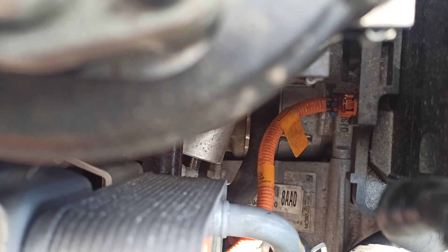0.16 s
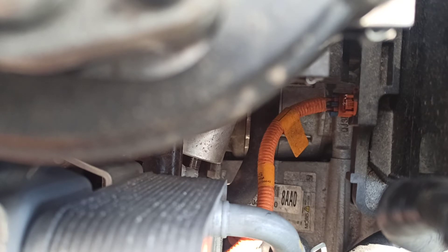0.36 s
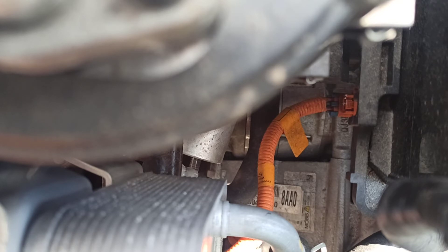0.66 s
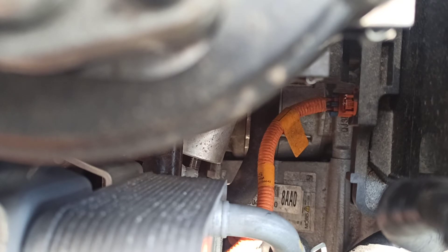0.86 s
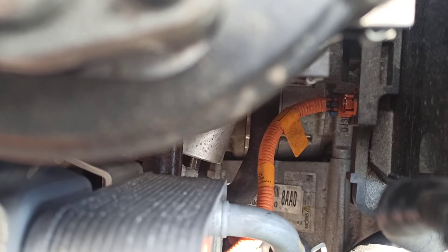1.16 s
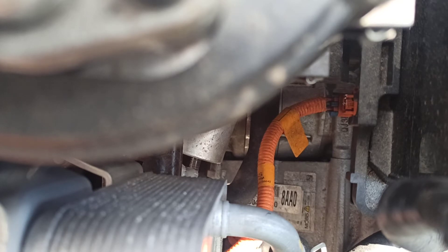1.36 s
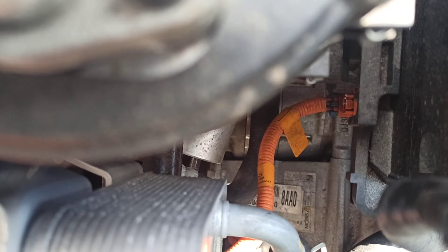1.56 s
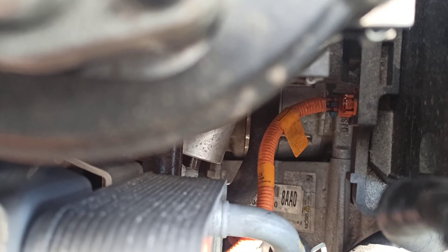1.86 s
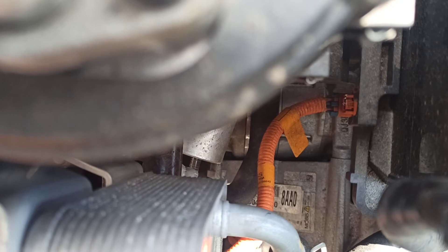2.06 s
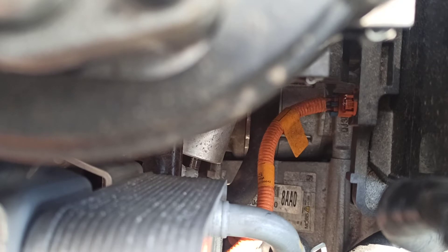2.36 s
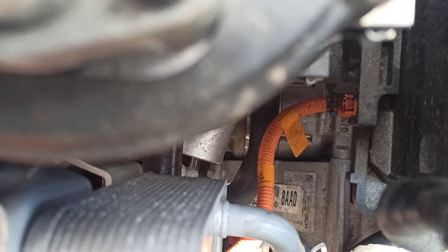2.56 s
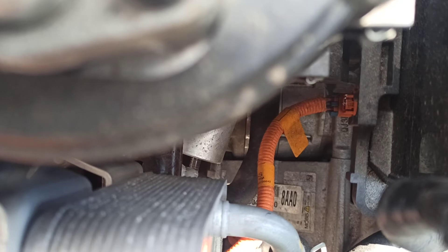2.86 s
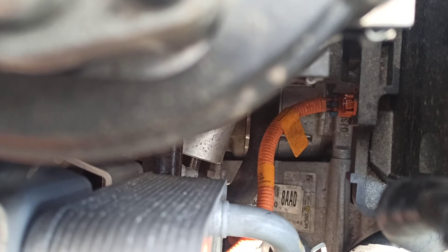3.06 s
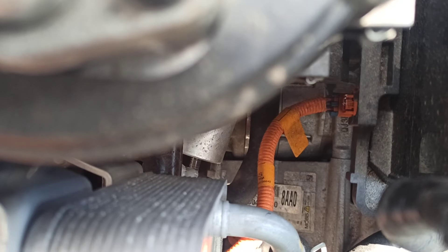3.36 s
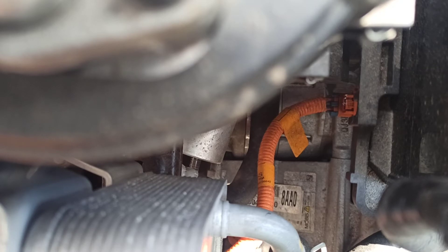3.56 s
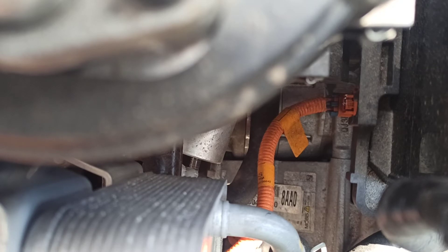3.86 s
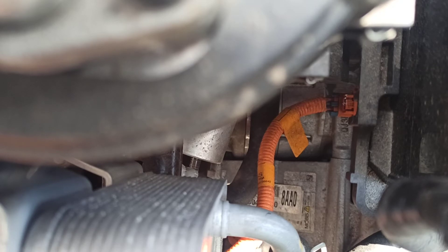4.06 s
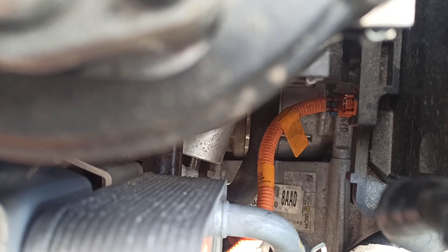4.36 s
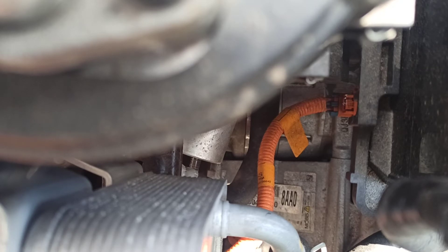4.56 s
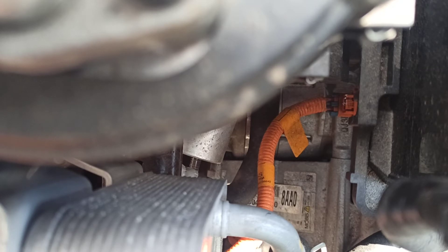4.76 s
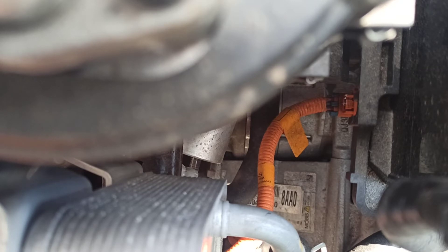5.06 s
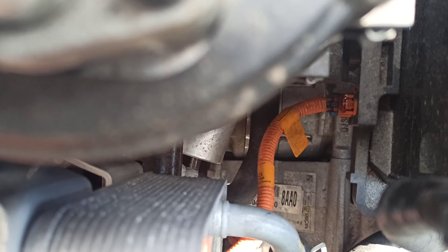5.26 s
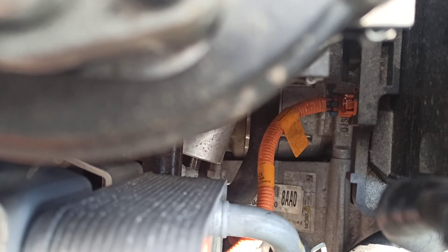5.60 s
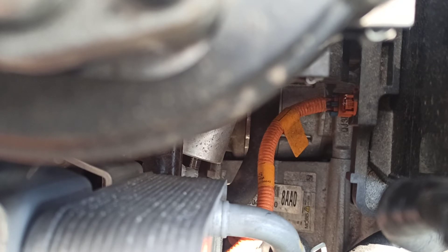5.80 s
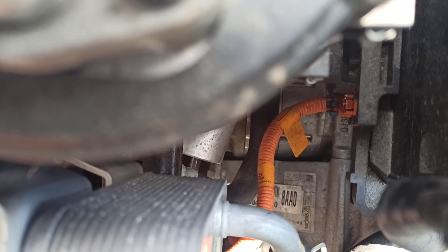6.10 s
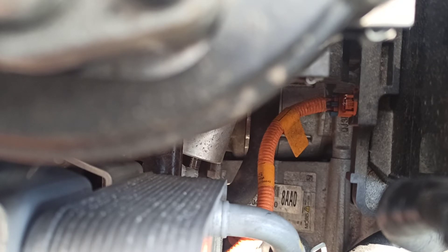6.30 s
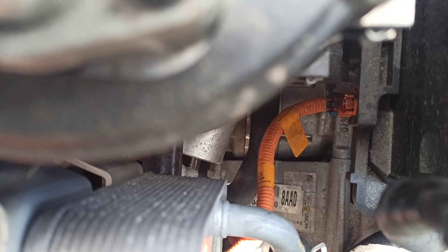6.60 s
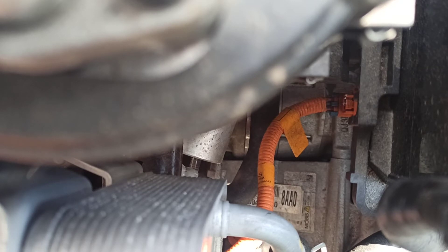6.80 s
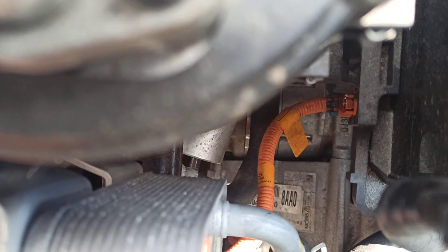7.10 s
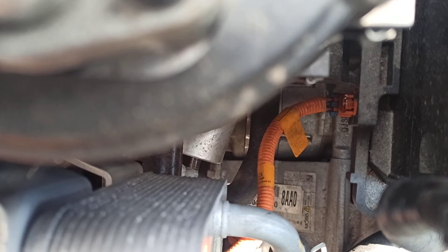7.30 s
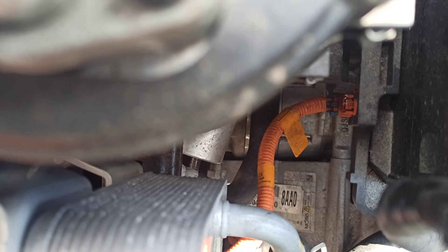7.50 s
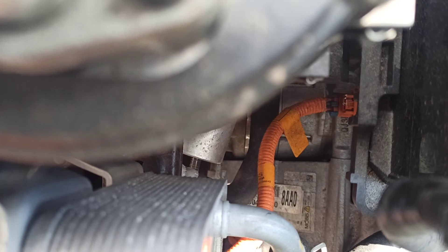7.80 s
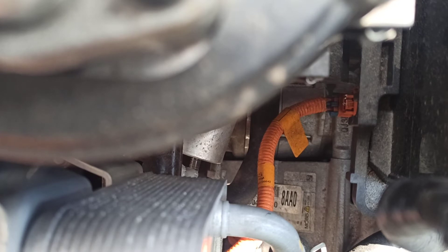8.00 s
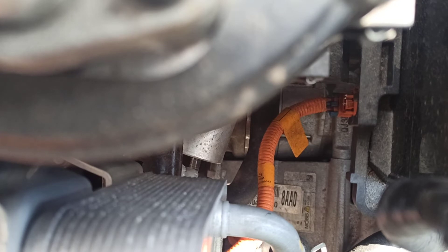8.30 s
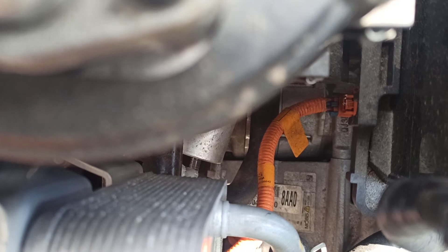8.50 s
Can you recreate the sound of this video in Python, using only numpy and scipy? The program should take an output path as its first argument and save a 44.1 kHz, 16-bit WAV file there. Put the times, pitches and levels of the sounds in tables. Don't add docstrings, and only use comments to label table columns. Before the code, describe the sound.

Under a parked car, an electric compressor's switch clatters, its motor whines upward, hums and clunks to a stop, twice, over faint town rumble.

```python
import sys
import numpy as np
from scipy import signal
from scipy.fft import rfft, irfft
from scipy.io import wavfile
from scipy.ndimage import uniform_filter1d

SR = 44100
rng = np.random.default_rng(int(sys.argv[2]) if len(sys.argv) > 2 else 0)


def dump(signal):
    limited = np.clip(np.atleast_2d(signal).T, -1, 1)
    pcm = np.round(limited * 32767).astype(np.int16)
    wavfile.write(sys.argv[1], SR, pcm)


def natural_amplitude(level_db):
    exponent = np.asarray(level_db, float) / 20
    return 10 ** exponent


N = 381465
T = np.arange(N) / SR

# (start [s], end of the speeding up [s], current cut [s], rotor locked [s], overshoot pitch [Hz])
RUNS = [
    (1.55, 2.11, 3.095, 3.14, 2093),
    (7.162, 7.729, 7.91, 7.945, 2265),
]
# (time [s], knock [dB], thud [dB], crack [dB])
LATCHES = [
    [(0.9334, -10.5, -30, -27), (0.9398, -13.5, -19, -20.5), (0.9464, -8, -27, -33.5),
     (0.9504, -9.5, -34, -37.5), (0.9624, -11.5, -18.5, -23.5), (0.9784, -14, -20, -26),
     (1.0011, -14, -30, -31), (1.0114, -14.5, -25, -32), (1.0405, -16, -33, -28.5),
     (1.0535, -16, -26.5, -36.5)],
    [(6.3674, -20, -40.5, -46), (6.3724, -30, -40.5, -57), (6.3849, -8, -21, -24.5),
     (6.4058, -8.5, -23.5, -26.5), (6.4314, -21.5, -37, -32), (6.4444, -22, -27, -34)],
]
# (time [s], knock [dB], thud [dB], crack [dB])
STOPS = [
    (3.1465, -13.5, -24.5, -32),
    (7.9503, -14, -23.5, -31),
]
# (time [s], knock [dB], thud [dB], crack [dB])
TAPS = [(1.48, -37, -52.5, -58.5), (1.5284, -44, -43, -45.5), (2.1031, -38, -38.5, -60),
        (3.0884, -36.5, -60.5, -47.5), (4.2444, -59, -57, -68.5), (4.6174, -51.5, -59.5, -64),
        (4.6329, -47.5, -58, -58), (7.0259, -43.5, -74, -55.5), (7.0858, -44, -56, -59),
        (7.1487, -40.5, -45.5, -50), (8.0366, -50, -52, -60)]
# (time [s], level [dB])
TICKS = [
    (1.529, -42.5),
    (2.0991, -40.5),
    (7.151, -43.5),
]

# (pitch [Hz], width [Hz], level [dB])
PAN_MODES = [(476, 24, 0), (545, 28, -10), (590, 28, -9), (690, 50, -12), (787, 38, -8), (920, 40, -6),
             (1112, 26, -13)]
# (pitch [Hz], width [Hz], level [dB])
CAST_MODES = [(1372, 34, -8), (1537, 28, 3), (1666, 24, -12), (1794, 40, -3), (1890, 28, -5),
              (1990, 40, -10), (2102, 32, -3), (2155, 28, 4), (2387, 32, -4), (2544, 34, -10),
              (2927, 44, -14)]
# (pitch [Hz], width [Hz], level [dB])
SHELL_MODES = [(3275, 92, -0.5), (3620, 130, -3), (4044, 160, -3.5), (5190, 38, -12.5), (5386, 76, -16),
               (6590, 45, -3), (7170, 180, -3), (7340, 150, -3.5), (8000, 43, -8)]
# (pitch [Hz], width [Hz], level [dB])
PIPE_MODES = [(818, 6.5, 0), (533, 10, -9), (587, 9, -13), (2353, 11, -12)]
# (pitch [Hz], width [Hz], level [dB])
BRACKET_MODES = [(1480, 4.6, 0), (2380, 14, -2), (903, 10, 4), (640, 11.06, -4), (3520, 7, -9),
                 (7300, 11.05, -10.5), (7310, 6, -12.5)]
# list of (frequency [Hz], level per Hz [dB]), then its share [dB]
PAN_REST = ([(100, -37.5), (170, -16), (300, -28), (450, -9.5), (650, -7), (950, -1.5), (1250, -12),
             (1700, -50)], -3)
CAST_REST = ([(800, -41.5), (1150, -9.5), (1450, -0.5), (2100, 0.5), (2450, -9), (3000, -7.5), (4200, -35)],
              1.2)
SHELL_REST = ([(1590, -28.5), (2700, -3.5), (3520, -7), (4320, 1), (5020, -10.5), (6020, -11), (7450, -7.5),
               (8470, -16), (8860, -28.5), (10200, -34.5), (11100, -39.5), (12300, -24.5), (14900, -25),
               (16000, -28), (16500, -81.5)], 1)
TICK_REST = ([(2000, -40), (4300, -4.5), (5500, -4.5), (7500, 7), (8700, -3.5), (10000, -11), (12000, -1),
              (14500, 0.5), (16500, -3)], 0)
VALVE_REST = ([(500, -30), (800, -4.5), (950, 6), (1080, -8), (1250, -2.5), (1400, -13), (2000, -41)], 0)
# (frequency [Hz], left minus right [dB])
BODY_PAN = [(60, -2.5), (110, -3), (200, 3.5), (380, 5), (700, -0.5), (1290, 4), (2380, -1.5), (4400, -1.5),
            (8120, 10.5), (15000, -4.5)]
# (frequency [Hz], lead of the left port [radians])
BODY_TURN = [(0, 1.5), (1210, -2.5), (2150, -14), (3450, 0), (4130, -11), (4820, 6), (5860, 7.5),
             (6630, 7.5), (8790, -1), (10500, 5.5), (12600, 4.5), (13100, 13), (14000, 11.5), (16200, 11.5)]

# (frequency [Hz], level per Hz [dB])
TOWN_COLOUR = [(25, -48), (40, -19), (55, -16), (70, -5), (87, 0), (125, 0), (180, -9), (220, -5.5),
               (270, -13.5), (500, -15.5), (1000, -20.5), (2000, -28.5), (3500, -34.5), (5000, -60.5)]
# (frequency [Hz], level per Hz [dB])
HISS_COLOUR = [(1880, -32), (3200, -5), (3450, -2), (4570, 0.5), (5000, -9.5), (5460, -11.5), (6140, -1.5),
               (6850, 0), (8530, -6.5), (8890, -16.5), (11200, -15.5), (12100, -11), (15000, -7.5),
               (16200, -10), (16500, -33)]
# (frequency [Hz], likeness [0-1])
TOWN_ALIKE = [(60, 1), (130, 0.89), (290, .7), (640, 0.5), (1500, 0), (6000, 0.3), (15000, .05)]
# (frequency [Hz], lead of the left port [radians])
TOWN_TURN = [(0, 0), (520, 0.1), (2580, -7.3), (3880, -27.5), (4570, -20), (5170, -19), (7410, -30),
             (8530, -41.5), (8790, -41), (9130, -38.5), (9910, -28.5), (11300, -30), (14400, -38.5),
             (16200, -55)]
# (start [s], length [s], pitch [Hz])
SQUEALS = [
    (-.05, .22, 590),
    (4.43, .09, 585),
    (3.25, .35, 1770),
    (3.78, .3, 1800),
    (3.3, .8, 2030),
    (8.1, .5, 1775),
]
SQUEAL_DB = [-61, -56.5, -74, -73, -78, -74]

TEETH, POLES = 60, 5


def hits():
    rows = []
    for latch in LATCHES:
        for row in latch:
            ring_db = (-36.5, -34) if row is latch[-1] else (-47.5, -52.5)
            rows.append((*row, *ring_db))
    for row in TAPS:
        knock_db = row[1]
        rows.append((*row, knock_db - 16, knock_db - 24))
    return sorted(rows) + [(*row, -29.5, -50) for row in STOPS]


def blows():
    size = 4096
    force, t = np.zeros((6, 2, N + size)), np.arange(size) / SR
    rows = hits()
    contact = np.sqrt(size) * (t == 0)
    rise_s, decay_s = .0006, np.array([.006, .006, .009])[:, None, None]
    tails = np.exp(-t / decay_s) * (1 - np.exp(-t / rise_s))
    for (s, knock_db, thud_db, crack_db, pipe_db, bracket_db), chatter in zip(rows, grit((len(rows), 3, size))):
        i = int(s * SR)
        # (level [dB], share of first contact)
        kinds = (thud_db + 0.5, 1.2), (knock_db - 6.5, .15), (crack_db + 2.5, .08)
        for k, (db, share) in enumerate(kinds):
            force[k, :, i:i + size] += natural_amplitude(db) * (share * contact + unit(chatter[k] * tails[k])) / 3.68
        force[3:5, :, i:i + size] += natural_amplitude([[[pipe_db]], [[bracket_db]]]) * contact / 5.7
    for (s, db), chatter in zip(TICKS, grit((len(TICKS), size))):
        i = int(s * SR)
        force[5, :, i:i + size] += natural_amplitude(db - 13.5) * unit(chatter * np.exp(-t / .004))
    return force[..., :N]


def drive():
    start_hz, climb_hz_per_s, cruise_hz = 214.1, 1590, 1118
    surge_s, settle_s, ease_s = .05, .145, .32
    hz, effort_db = np.full(N, start_hz), np.zeros(N)
    coast, on = np.zeros(N), np.zeros(N)
    for start, top, cut, lock, overshoot_hz in RUNS:
        now = (T > start) & (T < lock)
        ramp = start_hz + climb_hz_per_s * (np.clip(T, start, top) - start)
        surge = np.clip((T - top) / surge_s, 0, 1)
        late = np.clip(T - top - surge_s, 0, None)
        goal = cruise_hz + (overshoot_hz - cruise_hz) * np.exp(-late / settle_s)
        hz = np.where(now, ramp + surge * (goal - ramp), hz)
        ease = np.exp(-late / ease_s)
        effort_db += now * surge * (5.5 * ease - 18 * (1 - ease))
        coast += now * np.clip((T - cut) / 0.004, 0, 1)
        on += now
    return hz, effort_db, coast, uniform_filter1d(on, size=400)


def scroll(turn):
    hz, _, coast, on = drive()
    octaves = np.log2(hz / 1000)
    thud_db = -52 + 4 * octaves + 7 * coast
    knock_db = -54 + 6.9 * octaves - 7 * coast
    hiss_db = -56.5 + 7.1 * octaves - 4.5 * coast
    beat_db = 2 * np.cos(turn) + 1.6 * walk(60)
    thud_db = thud_db + sum(19.5 * np.exp(-np.abs(T - run[0]) / 0.018) for run in RUNS)
    levels_db = np.array([thud_db, knock_db, hiss_db, thud_db - 9.0, knock_db - 37, hiss_db - 4.5])
    beat_share = np.array([[1], [1], [.5], [1], [1], [.5]])
    return on * grit((6, N)) * natural_amplitude(beat_share * beat_db + levels_db)[:, None]


def motor():
    hz, load_db, _, on = drive()
    load_db = load_db + 4 * np.log2(hz / 1000)
    slack_s, slack_db = .14, -9
    slack = sum(np.clip(2 * (T - run[1] + slack_s) / slack_s, 0, 1) * (T < run[1]) for run in RUNS)
    whine_db = -56 + load_db + slack_db * slack
    undertone_db = -61 + load_db - slack_db * slack / 2

    phase = 2 * np.pi * np.cumsum(hz * (1 + .02 * walk(70))) / SR
    phase += 1.3 * np.sin(phase / TEETH)
    turn = phase / TEETH
    tones = 0
    for k, level_db in ((1, whine_db), (.43, undertone_db)):
        lead = read(BODY_TURN, k * hz, False) / 2
        pan = read(BODY_PAN, k * hz) / 2
        beat_db = 1.9 * walk(40) + 4.5 * np.cos(turn)
        size = np.sqrt(2) * natural_amplitude(level_db + beat_db + np.array([pan, -pan]))
        tones = tones + size * np.sin(k * phase + np.array([lead, -lead]))

    field = phase * POLES / TEETH
    carrier_hz, carrier_db = 9900, -84
    sway = .3 + .7 * np.cos(field) + 1.23 * np.cos(2 * field)
    switching = sway * np.sin(2 * np.pi * carrier_hz * T)
    speeding_up = uniform_filter1d(1. * (np.gradient(hz) > 0), size=4000)
    switching_db = 7.8 * speeding_up + carrier_db + 1.9 * walk(17)
    return on * tones, on * natural_amplitude(switching_db) * switching, turn


def valve(turn):
    on = drive()[-1]
    build_s, angle, sharpness = .2, 2.1, 2.2
    pressure = sum(np.clip((T - run[1]) / build_s, 0, 1) * (T < run[2]) for run in RUNS)
    puffs = unit(np.exp(sharpness * np.cos(turn - angle)))
    gas = natural_amplitude(-52.5) * on * pressure * puffs * grit((N,))
    return signal.fftconvolve(gas, body([], VALVE_REST), axes=1)[:, :N]


def body(modes, rest=None, size=16384):
    t, hz = np.arange(size) / SR, np.fft.rfftfreq(size, 1 / SR)
    lag_s = 0.000504
    out = np.zeros((2, size))
    for k, (f, width, db) in enumerate(modes):
        lead, pan = read(BODY_TURN, f, False) / 2, read(BODY_PAN, f) / 2
        ring = np.sin(2 * np.pi * f * t + np.array([[lead], [-lead]]) + k * np.pi)
        out += natural_amplitude(db) * width * natural_amplitude([[pan], [-pan]]) * ring * np.exp(-np.pi * width * t)
    out = unit(out)
    if rest:
        colour, share_db = rest
        pan = read(BODY_PAN, hz) / 2
        way = np.array([natural_amplitude(pan), natural_amplitude(-pan) * np.exp(-2j * np.pi * hz * lag_s)])
        broad = irfft(way * rfft(causal(colour, size))) * (t < size / SR / 2)
        out = unit(out + natural_amplitude(share_db) * unit(broad))
    return out / np.sqrt(size)


def town():
    hz = np.fft.rfftfreq(N, 1 / SR)
    alike, turn = read(TOWN_ALIKE, hz), read(TOWN_TURN, hz, False)
    rumble_db = -51.5 + .6 * walk(0.88) + 0.37 * walk(8.1)
    rumble = ports(N, read(TOWN_COLOUR, hz), alike, turn, 0.) * natural_amplitude(rumble_db)
    hiss_pan_db = 2.5 * np.exp(-np.log2((hz + 1) / 7000) ** 2)
    hiss = ports(N, read(HISS_COLOUR, hz), alike, turn, hiss_pan_db) * natural_amplitude(-66.5)
    for (s, length, f), db in zip(SQUEALS, SQUEAL_DB):
        swell = np.sqrt(np.clip(np.sin(np.pi * np.clip((T - s) / length, 0, 1)), 0, 1))
        phase = 2 * np.pi * f * np.cumsum(1 + 0.00414 * walk(45)) / SR
        rumble += swell * natural_amplitude(db + 2.8 * walk(24.93)) * np.sin(phase)
    return rumble + hiss


def ports(size, colour_db, alike, turn, pan_db):
    a, b = rfft(rng.standard_normal((2, size)))
    alike = np.clip(alike, 0, 1)
    right = alike * a * np.exp(-1j * turn) + np.sqrt(1 - alike ** 2) * b
    both = np.array([a * natural_amplitude(pan_db / 2), right * natural_amplitude(-pan_db / 2)])
    return unit(irfft(natural_amplitude(colour_db) * both, size))


def grit(shape):
    a, b = rng.standard_normal((2, *shape))
    alike = 0.63
    return np.stack([a, alike * a + np.sqrt(1 - alike ** 2) * b], axis=-2)


def causal(colour, size):
    cep = irfft(np.log(natural_amplitude(read(colour, np.fft.rfftfreq(size, 1 / SR)))))
    cep[1:size // 2] *= 2
    cep[size // 2 + 1:] = 0
    return irfft(np.exp(rfft(cep)))


def walk(rate):
    k = int(SR / rate)
    steps = np.repeat(rng.standard_normal(N // k + 1), k)
    return 1.3 * uniform_filter1d(uniform_filter1d(steps, k), k)[:N]


def read(table, hz, log=True):
    f, v = np.transpose(table)
    return np.interp(np.log(hz + 1), np.log(f + 1), v) if log else np.interp(hz, f, v)


def unit(x):
    return x / np.sqrt(np.mean(x ** 2) + 1e-30)


def scene():
    tones, carrier, turn = motor()
    parts = (body(PAN_MODES, PAN_REST), body(CAST_MODES, CAST_REST), body(SHELL_MODES, SHELL_REST),
             body(PIPE_MODES), body(BRACKET_MODES), body([], TICK_REST))
    force = blows() + scroll(turn)
    force[:2] += natural_amplitude([[[-9.5]], [[-11]]]) * tones
    rung = sum(signal.fftconvolve(f, p, axes=1)[:, :N] for f, p in zip(force, parts))
    no_bass = signal.butter(4, 110, "high", fs=SR, output="sos")
    airborne = natural_amplitude(-18) * tones
    return signal.sosfilt(no_bass, rung) + airborne + carrier + town() + valve(turn)


def low_pass(x):
    return signal.sosfilt(signal.butter(12, 16640, fs=SR, output="sos"), x)


def record(dry):
    hz = np.fft.rfftfreq(N, 1 / SR)
    top_hz = 15700
    notch_db = -9 * np.exp(-((hz - 11020) / 430) ** 4)
    dip_db = -3 * np.exp(-((hz - 10080) / 1500) ** 20)
    top_db = -45 * np.clip((hz - top_hz) / (top_hz / 100), 0, 1)
    mix = irfft(rfft(dry) * natural_amplitude(notch_db + dip_db + top_db), N)
    return low_pass(mix)


dry = scene()
out = record(dry)
dump(out)
```